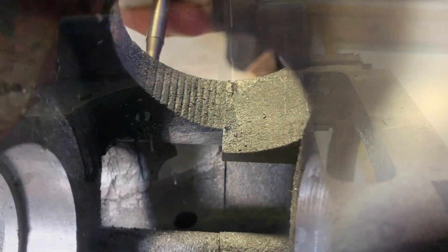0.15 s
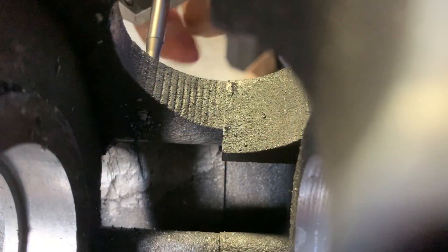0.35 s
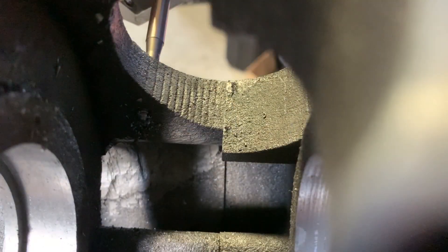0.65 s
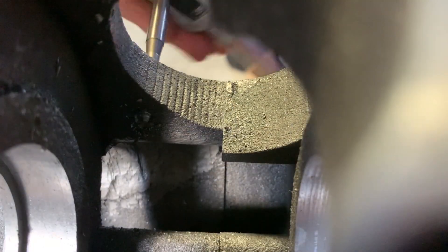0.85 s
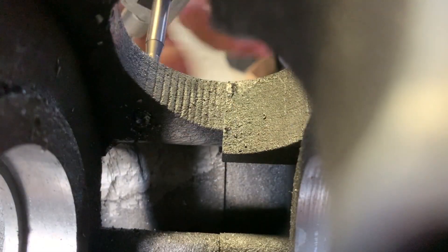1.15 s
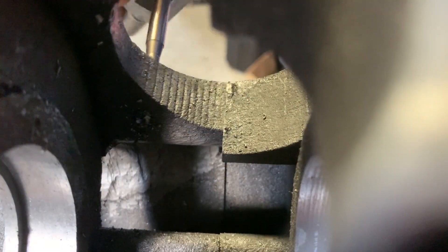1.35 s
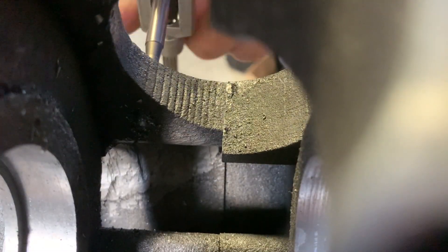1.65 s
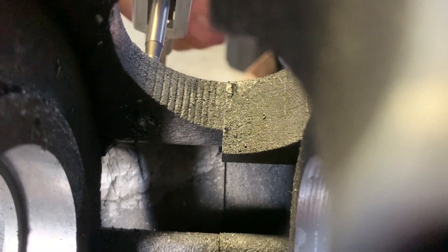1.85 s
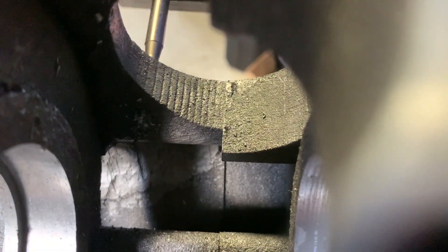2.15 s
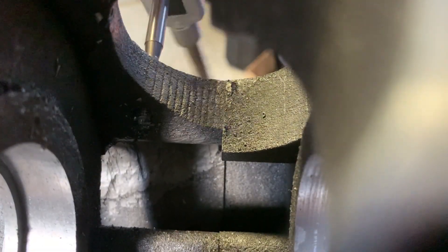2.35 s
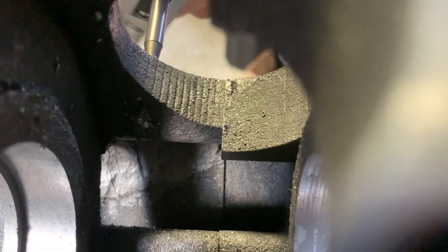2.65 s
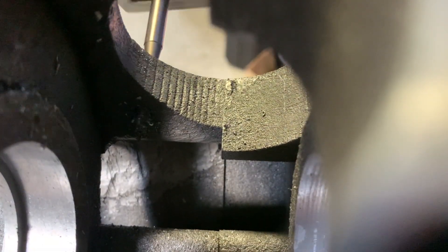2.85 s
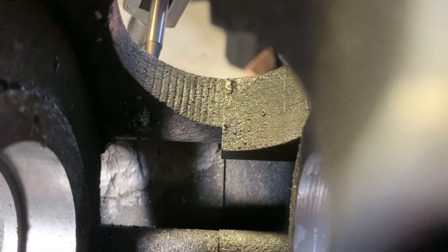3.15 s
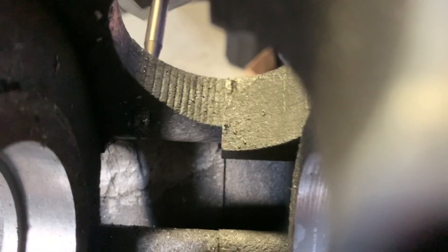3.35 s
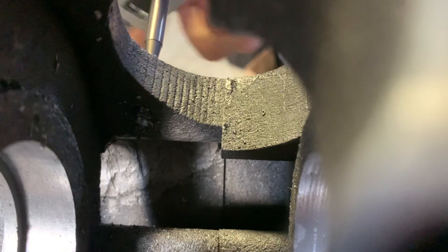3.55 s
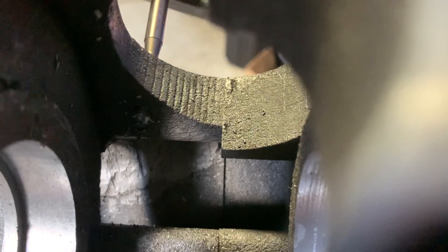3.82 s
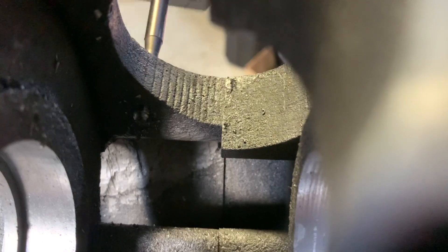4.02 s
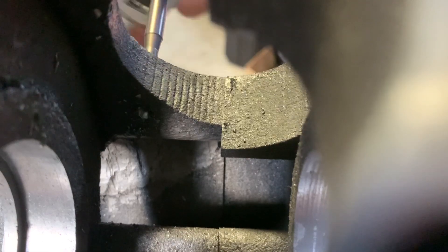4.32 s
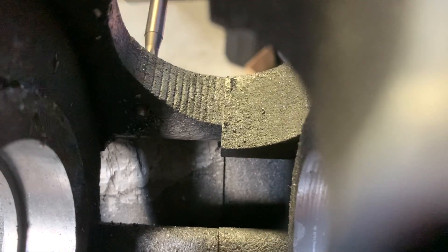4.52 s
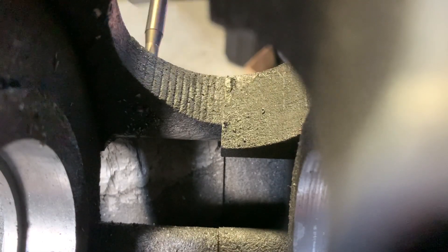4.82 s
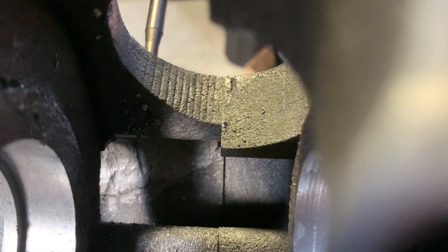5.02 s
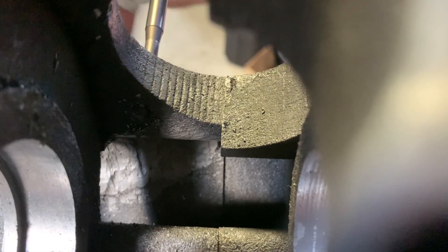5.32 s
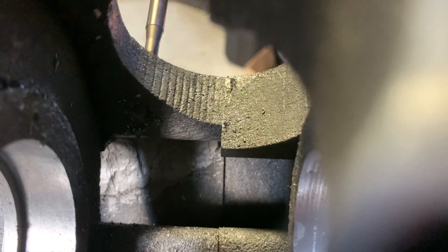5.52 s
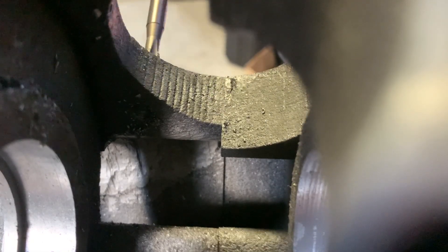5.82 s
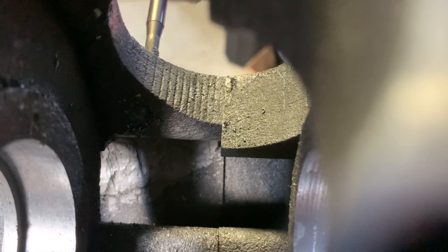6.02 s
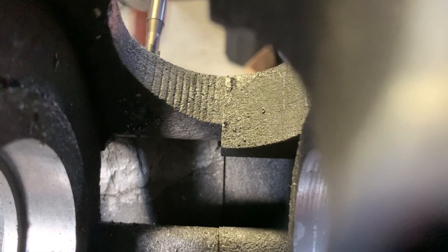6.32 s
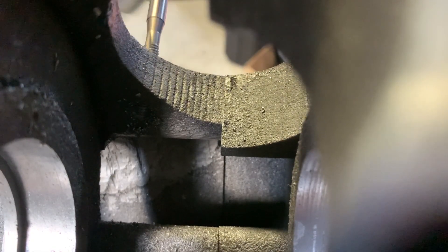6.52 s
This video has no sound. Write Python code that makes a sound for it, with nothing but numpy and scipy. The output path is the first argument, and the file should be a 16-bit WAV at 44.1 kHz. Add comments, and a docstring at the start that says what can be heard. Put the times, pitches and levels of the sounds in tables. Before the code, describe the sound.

Close-up of a steel tap turned push by push in a cast metal part: grainy hiss, low rumble, sharp irregular clicks growing denser.

```python
"""A hand tap is turned into a cast metal part, push by push, with the microphone right at the casting.
From the start the rubbing steel hisses as grainy noise with crumb ticks; the heavy part rumbles on its bench as
low noise in a quiet workshop of faint air and tail. Soon pushes knock its low modes, and the hand slides along
the wrench as a sinking noise band. Then chips snap and the wrench clicks in its play: noise bursts that ring the
same metal as the rubbing, with decaying sines from the steel. Later come two faint squeaks, falling sines."""
import sys
import numpy as np
from scipy import signal
from scipy.fft import rfft, irfft
from scipy.io import wavfile

SR = 44100
rng = np.random.default_rng(int(sys.argv[2]) if len(sys.argv) > 2 else 0)


def output_pcm(signal):
    """Save a mono or channel-first signal as 16-bit PCM at the path in sys.argv[1].

    Samples are clipped to [-1, 1] before scaling.
    """
    pcm = np.clip(np.atleast_2d(signal).T, -1, 1) * 32767
    wavfile.write(sys.argv[1], SR, np.round(pcm).astype(np.int16))


N = 294147  # length [samples]

# Levels in the tables are starting levels: the layers trim them and the casting colours them.
# pushes of the hand that turn the tap:
# (start [s], length [s], scraping [dB], fine hiss [dB], load on the part [dB], deep rocking [dB])
PUSHES = [(-0.04, 0.26, -65.5, -52, -55, -67), (0.693, 0.32, -67.5, -52.5, -56.5, -81),
          (1.342, 0.31, -70.5, -56, -49, -63), (1.873, 0.22, -78, -72.5, -49.5, -50),
          (2.05, 0.57, -75, -66, -61.5, -63), (2.575, 0.27, -75, -66, -57.5, -50),
          (2.777, 0.2, -78.5, -72.5, -65, -51.5), (3.284, 0.33, -74, -70, -57, -46),
          (3.56, 0.33, -70.5, -66, -50.5, -47), (3.834, 0.22, -76.5, -67.5, -52.5, -51),
          (4.005, 0.27, -72, -63, -46.5, -49), (4.229, 0.52, -75, -65.5, -48.5, -48),
          (4.674, 0.32, -69.5, -64, -45.5, -47), (4.977, 0.3, -73.5, -68.5, -51.5, -51),
          (5.219, 0.41, -74, -71.5, -51, -49.5), (5.563, 0.33, -74, -71.5, -51.5, -49.5),
          (5.853, 0.61, -79, -73.5, -56.5, -49), (6.371, 0.29, -84.5, -79, -54.5, -46.5)]
# chips snapping and the wrench clicking:
# (time [s], tick [dB], low clack [dB], top sparkle [dB], ring of the steel [dB])
CLICKS = [(1.3088, -52, -64, -30, -52.5), (1.3537, -38.5, -56, -75, -55), (1.369, -36, -58.5, -80, -75),
          (1.3803, -35, -61, -60, -58), (1.546, -55, -51, -62, -83), (1.752, -52, -59, -78, -69),
          (1.788, -45.5, -65, -79.5, -84), (1.8854, -50, -79, -78, -70), (1.9203, -42, -75, -53, -71),
          (1.93, -33.5, -56, -58, -75), (2.044, -45.5, -72, -73, -74), (2.729, -45.5, -54, -58, -69),
          (3.3178, -54, -70, -87, -61), (3.511, -42.5, -73, -66, -69), (3.6082, -37, -71, -67, -57.5),
          (3.879, -31, -46, -38, -82.5), (3.8904, -32.5, -53, -50, -74), (4.0729, -35.5, -56, -69, -78),
          (4.2449, -27, -44.5, -36, -73), (4.2509, -31.5, -49, -33, -74), (4.26, -28.5, -59.5, -45, -67),
          (4.296, -64, -84, -39.5, -87), (4.629, -48.5, -58.5, -75, -82), (4.715, -45, -60.5, -73, -72),
          (4.831, -56, -65, -28.5, -53.5), (5.0265, -31, -65, -48, -62), (5.044, -42, -60.5, -71, -65),
          (5.119, -47, -63, -80, -82), (5.2578, -22.5, -48, -34, -51), (5.334, -44, -68, -75, -63),
          (5.4219, -42, -65.5, -78, -69), (5.531, -40.5, -57, -81, -90), (5.6479, -33.5, -64, -42, -47.5),
          (5.688, -34, -63, -46, -51.5), (5.703, -41, -60, -70, -66), (5.805, -48.5, -66.5, -78, -88),
          (5.9029, -22, -51, -26.5, -41.5), (6.02, -28, -54, -36, -67), (6.0395, -44, -58, -70, -55.5),
          (6.107, -39, -63, -77, -69), (6.1945, -36, -52.5, -78, -86), (6.3062, -48.5, -56, -80, -91),
          (6.433, -38, -57, -77, -78), (6.4775, -34, -57, -70, -62.5), (6.6066, -46.5, -50.5, -84, -86)]
# knocks of the part on the bench: (time [s], upper modes [dB], deep modes [dB])
KNOCKS = [(0.885, -47.5, -43.5), (1.314, -39.5, -41), (1.371, -36.5, -48), (1.378, -41, -44.5),
          (1.552, -42.5, -46.5), (1.892, -41.5, -51), (1.929, -41.5, -45.5), (3.319, -37.5, -52),
          (3.334, -45, -36.5), (3.885, -34.5, -41), (3.896, -48, -37.5), (3.927, -45, -48),
          (4.251, -37, -35.5), (4.269, -55, -39.5), (5.041, -48.5, -45.5), (5.692, -41.5, -41),
          (5.798, -49.5, -48), (5.901, -43, -43), (6.039, -42.5, -54), (6.479, -48, -70)]
# faint falling squeaks: (time [s], level [dB])
SQUEAKS = [(2.439, -80), (3.22, -79)]
# resonances (positive) and hollows (negative) of the casting: (frequency [Hz], width [Hz], level [dB])
CASTING_MODES = [(790, 170, -7), (1105, 95, 12.5), (1520, 170, 5.5), (2764, 42, 15), (3086, 32, 11.5),
                 (3330, 220, -7), (3990, 100, 7), (4160, 160, 7.5), (4715, 50, 16.5), (5190, 110, 10),
                 (5420, 120, -4), (5792, 120, 7.5), (6220, 120, 5), (6570, 110, 7), (6917, 91, 10),
                 (7926, 115, 10.5), (8238, 91, 13.5), (8860, 150, 11), (9620, 105, 12), (9944, 85, 10),
                 (10262, 105, 13), (10820, 140, 8), (11400, 114, 9.5), (12024, 100, 7.5), (13390, 60, 10.5)]
# low modes of the part on its bench: (frequency [Hz], level [dB], t60 [s])
BENCH_MODES = [(61.8, -9, 0.37), (86.7, 2, 0.057), (126.8, -6, 0.35), (212, 0, 0.1), (254.4, 0, 0.11),
               (318.9, 2.5, 0.15), (458, -13.5, 0.16), (558.5, -9, 0.067)]
# free modes of tap and wrench: (frequency [Hz], level [dB], t60 [s])
TOOL_MODES = [(2760, 0, .062), (3087, -1.5, .08), (3610, -6, .04), (4716, -3, .045), (4920, -3, .03),
              (6917, 0, .03), (7580, 0, .025), (7995, 1, .03)]
# relative spectrum of the scraping edges: (frequency [Hz], density [dB per Hz])
SCRAPE_COLOUR = [(600, -8), (1000, -33), (1500, 5), (2400, -35), (2760, 1.5), (3100, -18), (4200, 2.5),
                 (5300, 8), (6500, 11), (8800, 2), (11000, -13)]
# relative spectrum of the fine hiss: (frequency [Hz], density [dB per Hz])
FINE_COLOUR = [(1100, -62), (1900, -17), (2700, -38), (3500, -55), (7000, -14.5), (8300, -5.5), (12000, 0),
               (13000, -4.5), (14200, -2.5), (16000, -2)]
# relative spectrum of the rasp in the firmest strokes: (frequency [Hz], density [dB per Hz])
RASP_COLOUR = [(230, -8), (330, 13), (550, 0), (1000, -22), (1450, -6), (1800, 8), (2200, 4), (2500, -8),
               (2760, 1), (3300, -25)]
# relative spectrum of the deep rocking: (frequency [Hz], density [dB per Hz])
DEEP_COLOUR = [(20, -43), (35, -10.5), (60, 8), (85, 6), (105, 4.5), (128, 1.5), (160, -1.5), (250, -46.5)]
# relative spectrum of the hollow rumble under load: (frequency [Hz], density [dB per Hz])
HOLLOW_COLOUR = [(120, -48), (180, -4.5), (220, 1.5), (270, -3.5), (320, 2), (375, -15.5), (410, -26.5),
                 (452, -12.5), (500, -22.5), (560, -19), (720, -33.5), (1300, -34), (3000, -47.5)]
# relative spectrum of the workshop air: (frequency [Hz], density [dB per Hz])
SHOP_COLOUR = [(30, 12), (100, 6), (300, 10.5), (1200, 2), (6000, -9.5), (16000, -8.5)]
# phase between the two microphone ports: (frequency [Hz], lead of the left [rad])
PORT_PHASE = [(120, 0), (330, .8), (450, .6), (600, -1.6), (780, -2.4), (1100, -.8), (1460, -1.7),
              (2400, -2.3), (2760, .4), (3080, 1.2), (3960, -1), (4800, -.4), (5600, -4.8), (6300, -6.1)]

# friction and load follow the speed of a push by these powers; a skew over 1 puts its top past the middle
FRICTION_POWER, LOAD_POWER, PUSH_SKEW = 1.05, 0.5, 1.12
# each resonance comes and goes as the point of contact moves
RUB_WANDER_DB, SNAP_WANDER_DB, WANDER_PER_S = 3, 1.4, 13
# stick and slip, slow and fast; surges of the scraping; rasp against the fine hiss
GRIP_DB, GRAIN_DB, SURGE_DB, SURGES_PER_S, RASP_DB = 1.4, 2.1, 2.8, 55, -14
# crumbs: rate at full load, level against the load, spread of sizes before clipping, decay
CRUMBS_PER_S, CRUMB_DB, CRUMB_SPREAD_DB, CRUMB_T60_S = 34, -15.5, 5, 0.018
# rumble at rest, before the trims; unevenness of the rumble
REST_DEEP_DB, REST_HOLLOW_DB, JUDDER_DB = -55, -64, 2.8
# sway after a knock, against its deep level and before the rumble's trim
SWAY_DB, SWAY_T60_S, SWAY_RISE_S = -4, 3.44, 0.0083
# weaker bump after a knock: average delay, level against the knock
BUMP_S, BUMP_DB = 0.022, -7
# workshop air and tail
SHOP_DB, SHOP_T60_S = -77, 0.19
# swish of the hand along the wrench; the flutter rate sets how wide the noise band is
SLIDE_S, SLIDE_LENGTH_S, SLIDE_DB = 1.15, 0.85, -75
SLIDE_HZ, SLIDE_FALL_HZ_PER_S, SLIDE_FLUTTER_PER_S = 2000, 850, 900
# a click: decay of the heaviest rattle before its rise is added, decay of the sparkle, slowest rise
RATTLE_T60_S, SPARKLE_T60_S, CRUNCH_S = 0.036, 0.026, 0.0035
CRACK_DB = 2.5  # first crack of a click, against its rattle
SQUEAK_S, SQUEAK_HZ, SQUEAK_FALL_HZ_PER_S, SQUEAK_WAVER_HZ = 0.1, 3420, 4000, 210
# differences between the ports: knock strengths, and a treble lag above a given frequency
PORT_SCATTER_DB, PORT_LAG_S, LAG_FROM_HZ = 1.5, .00014, 6300
CUTOFF_HZ = 15750


def from_db(db):
    """Decibels to gain."""
    return 10 ** (np.asarray(db) / 20)


def rms_one(x):
    """Scale to rms 1."""
    return x / np.sqrt(np.mean(x ** 2) + 1e-20)


def at_bins(points):
    """Read a table at every frequency bin, interpolating along log frequency."""
    hz, value = np.transpose(points)
    bin_hz = np.arange(N // 2 + 1) * SR / N
    return np.interp(np.log(bin_hz + 1), np.log(hz), value)


def drift(rate):
    """Random movement with rms 1: straight lines between chance values, rate of them per second."""
    knots = rng.standard_normal(int(N / SR * rate) + 2)
    return rms_one(np.interp(np.arange(N) / SR * rate, np.arange(len(knots)), knots))


def white(apart):
    """Stereo white noise; apart is the size of side against mid."""
    mid, side = rng.standard_normal((2, N))
    return mid + apart * side * np.array([[1], [-1]])


def coloured(spectrum, apart):
    """Stereo noise with a given spectrum, rms 1."""
    return rms_one(irfft(rfft(white(apart)) * from_db(at_bins(spectrum)), N))


def band(x, low_hz, high_hz):
    """Causal band-pass."""
    sos = signal.butter(2, [low_hz, min(high_hz, .45 * SR)], "band", fs=SR, output="sos")
    return signal.sosfilt(sos, x + 1e-18)


def bursts(times, levels_db, t60s, rises_s):
    """Envelope of short bursts that build up and die away; their powers add."""
    t = np.arange(int(np.max(t60s) * SR)) / SR
    power = np.zeros(N + len(t))
    for s, level_db, t60, rise_s in zip(*np.broadcast_arrays(times, levels_db, t60s, rises_s)):
        at = int(s * SR)
        decay = from_db(level_db - 60 * t / t60)
        power[at:at + len(t)] += (decay * (1 - np.exp(-t / rise_s))) ** 2
    return np.sqrt(power[:N])


def ring(pushes, hz, t60):
    """A unit push sets a decaying sine of starting height 1 ringing."""
    r, w = from_db(-60 / (t60 * SR)), 2 * np.pi * hz / SR
    return signal.lfilter([0, np.sin(w)], [1, -2 * r * np.cos(w), r * r], pushes + 1e-18)


def arch(start_s, length_s, skew=1):
    """Half a sine over the given time, zero outside it; a skew over 1 puts the top later."""
    part = np.clip((np.arange(N) / SR - start_s) / length_s, 0, 1)
    return np.sin(np.pi * part ** skew) * (part < 1)


def turning():
    """Gains of scraping, fine hiss, load and rocking: each push speeds the wrench up and slows it down again."""
    power = 0
    for start_s, length_s, *levels_db in PUSHES:
        speed = arch(start_s, length_s, PUSH_SKEW)
        rub, load = speed ** FRICTION_POWER, speed ** LOAD_POWER
        gains = from_db(levels_db)[:, None] * np.array([rub, rub, load, load])
        power = power + gains ** 2
    return np.sqrt(power)


def metal(force, wander_db):
    """Each resonance lifts, each hollow dips a narrow band of what shakes the metal, by a wandering amount."""
    out = force
    for hz, width_hz, level_db in CASTING_MODES:
        r = np.exp(-np.pi * width_hz / SR)
        wander = wander_db * drift(WANDER_PER_S).clip(-2, 1.3)
        lift = from_db(level_db + wander) - 1  # what to add to the plain sound
        zeros = [(1 - r * r) / 2, 0, (r * r - 1) / 2]
        poles = [1, -2 * r * np.cos(2 * np.pi * hz / SR), r * r]
        out = out + signal.lfilter(zeros, poles, lift * force_or(out, lift))
    return out


def force_or(sound, _lift):
    """The sound as shaped by the modes so far drives the next one."""
    return sound


def friction(scrape, fine_rub):
    """Countless tiny slips make a grainy hiss; the edges catch and let go, so the scraping below it surges."""
    grip = from_db(GRIP_DB * drift(40) + GRAIN_DB * drift(400))
    surge = from_db(SURGE_DB * drift(SURGES_PER_S))
    scraping = scrape * surge * coloured(SCRAPE_COLOUR, apart=0.058)
    fine = fine_rub * coloured(FINE_COLOUR, apart=0.0064)
    # squaring favours the firmest strokes
    rasp_gain = fine_rub ** 2 / fine_rub.max() * from_db(RASP_DB)
    rasp = rasp_gain * coloured(RASP_COLOUR, apart=0.099)
    return grip * (scraping + fine + rasp)


def crumbs(load):
    """Crumbs of metal break off at random as faint ticks, more often under load."""
    at = np.flatnonzero(rng.random(N) < CRUMBS_PER_S * load / load.max() / SR)
    spread_db = CRUMB_SPREAD_DB * rng.standard_normal(len(at)).clip(-2, 1.2)
    sizes_db = 20 * np.log10(load[at]) + CRUMB_DB + spread_db
    noise = rms_one(band(white(0.14), 820, 7000))
    return noise * bursts(at / SR, sizes_db, CRUMB_T60_S, 0.0017)


def rumble(load, rocking):
    """The part shifts unevenly on the bench under the hand, and sways on after each knock."""
    s, _, deep_db = np.transpose(KNOCKS)
    sway = bursts(s, deep_db + SWAY_DB, SWAY_T60_S, SWAY_RISE_S)
    deep_gain = np.sqrt(rocking ** 2 + sway ** 2 + from_db(REST_DEEP_DB) ** 2)
    hollow_gain = np.hypot(load, from_db(REST_HOLLOW_DB))
    judder_db = JUDDER_DB * drift(35)
    deep = deep_gain * from_db(judder_db - 8) * coloured(DEEP_COLOUR, apart=0.58)
    hollow = hollow_gain * from_db(judder_db - 4.5) * coloured(HOLLOW_COLOUR, apart=0.54)
    return deep + hollow


def workshop_air():
    """The still air of the shop: a steady, wide noise floor."""
    return from_db(SHOP_DB) * coloured(SHOP_COLOUR, apart=1.0)


def workshop_tail(x):
    """A diffuse tail of decaying noise, different at each port."""
    t = np.arange(SR // 2) / SR
    tail = band(rng.standard_normal((2, len(t))), 400, 5600) * from_db(-60 * t / SHOP_T60_S)
    unit_tail = tail / np.sqrt(np.sum(tail ** 2) / 2)
    return signal.fftconvolve(x, unit_tail, axes=1)[:, :N]


def knocks():
    """Soft pushes, each with a loose bump after it, ring the low modes, a little differently at each port."""
    s, upper_db, deep_db = np.transpose(KNOCKS)
    bump_s = s + BUMP_S * (.5 + rng.random(len(s)))
    knock_at, bump_at = (s * SR).astype(int), (bump_s * SR).astype(int)
    out = np.zeros((2, N))
    for k, (hz, level_db, t60) in enumerate(BENCH_MODES):
        pushes = np.zeros((2, N))
        strength_db = deep_db + 1.0 if hz < 170 else upper_db - 2.5
        shared, *by_port = rng.standard_normal((3, len(s)))
        scatter_db = 2 * shared + PORT_SCATTER_DB * np.array(by_port)
        pushes[:, knock_at] = from_db(strength_db + level_db + scatter_db)
        pushes[:, bump_at] += from_db(BUMP_DB) * pushes[:, knock_at]
        out += (-1) ** k * ring(pushes, hz, t60)  # neighbouring modes start in opposite directions
    return band(out, 24, 850)


def slide():
    """Skin slides on the wrench: a soft band of noise that sinks in pitch."""
    since_start = np.clip(np.arange(N) / SR - SLIDE_S, 0, SLIDE_LENGTH_S)
    hz = SLIDE_HZ - SLIDE_FALL_HZ_PER_S * since_start
    phase = 2 * np.pi * np.cumsum(hz) / SR
    swish = drift(SLIDE_FLUTTER_PER_S) * np.sin(phase) + drift(SLIDE_FLUTTER_PER_S) * np.cos(phase)
    return from_db(SLIDE_DB) * arch(SLIDE_S, SLIDE_LENGTH_S) * swish


def clicks():
    """Each snap is a sharp crack and a dense rattle of reflections in the metal, with a duller clack below."""
    s, tick_db, clack_db, sparkle_db, _ = np.transpose(CLICKS)
    # bright snaps let go at once, dull contacts crunch for a few milliseconds
    brightness_db = np.maximum(tick_db, sparkle_db) - clack_db
    rise_s = np.clip(0.0086 * from_db(-.8 * brightness_db), .0003, CRUNCH_S)
    # a light chip is over at once; heavy or crunching contacts rattle on
    weight = from_db(.4 * (clack_db - clack_db.max()))
    rattle_s = np.maximum(RATTLE_T60_S * weight, .012) + 5 * rise_s

    def snap(level_db, t60):
        """Envelope of a rattle with a shorter crack in front."""
        rattle = bursts(s, level_db, t60, rise_s)
        crack = bursts(s, level_db + CRACK_DB, 0.0036, rise_s / 2)
        return rattle + crack

    clack = rms_one(band(white(0.61), 415, 1800)) * bursts(s, clack_db, 0.055, rise_s)
    tick = rms_one(band(white(0.086), 3160, 7670)) * snap(tick_db - 13.0, rattle_s)
    sparkle = rms_one(band(white(0.019), 7500, 13300)) * snap(sparkle_db - 7.0, SPARKLE_T60_S)
    return clack + tick + sparkle


def tool_ring():
    """Every snap leaves the steel ringing briefly, each mode with a strength of its own."""
    s, *_, ring_db = np.transpose(CLICKS)
    at = ((s + .001) * SR).astype(int)
    out = np.zeros(N)
    for hz, level_db, t60 in TOOL_MODES:
        pushes = np.zeros(N)
        pushes[at] = from_db(ring_db + level_db + 2 * rng.standard_normal(len(s)))
        out += ring(pushes, hz, t60)
    return out


def squeaks():
    """A faint unsteady whistle that slides down in pitch."""
    out, t = np.zeros(N), np.arange(N) / SR
    for s, level_db in SQUEAKS:
        fall_hz = SQUEAK_FALL_HZ_PER_S * np.clip(t - s, 0, SQUEAK_S)
        hz = SQUEAK_HZ - fall_hz + SQUEAK_WAVER_HZ * drift(600)
        out += from_db(level_db) * arch(s, SQUEAK_S) * np.sin(2 * np.pi * np.cumsum(hz) / SR)
    return out


def ports(x):
    """Low resonances reach the two ports in phases of their own; the treble arrives later on the right."""
    hz = np.arange(N // 2 + 1) * SR / N
    lead = at_bins(PORT_PHASE) + 2 * np.pi * PORT_LAG_S * np.maximum(hz - LAG_FROM_HZ, 0)
    turn = np.exp(.5j * lead * np.array([[1], [-1]]))  # half the lead to each side
    return irfft(rfft(x, axis=1) * turn, N)


def scene():
    """Friction and clicks ring the metal, over the rumble and the still air of the shop."""
    scrape, fine_rub, load, rocking = turning()
    rubbing = metal(friction(scrape, fine_rub), RUB_WANDER_DB)
    snapping = metal(clicks() + crumbs(load), SNAP_WANDER_DB)
    steel = tool_ring() * from_db([[1.5], [-1.5]])  # leans to the left
    cutting = rubbing + snapping + steel + slide() + squeaks()
    close = ports(cutting + knocks() + rumble(load, rocking))
    return close + from_db(-13) * workshop_tail(cutting) + workshop_air()


def record(dry):
    """The top is cut steeply."""
    return signal.sosfilt(signal.ellip(10, .2, 80, CUTOFF_HZ, fs=SR, output="sos"), dry)


dry = scene()
out = record(dry)
output_pcm(out)
```